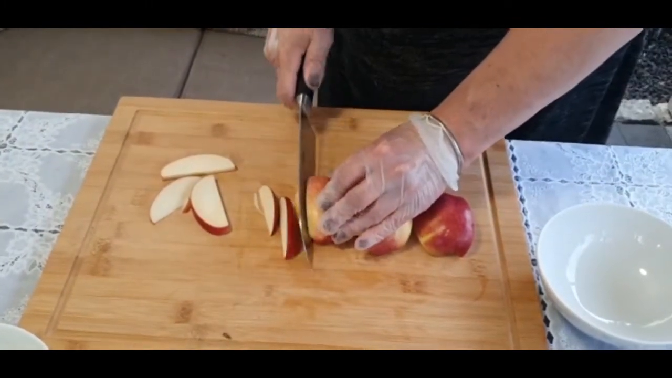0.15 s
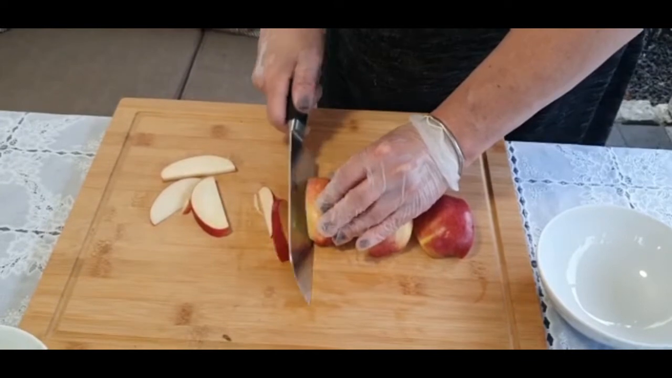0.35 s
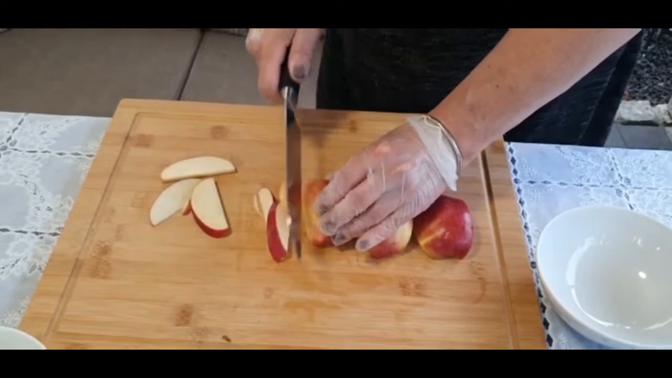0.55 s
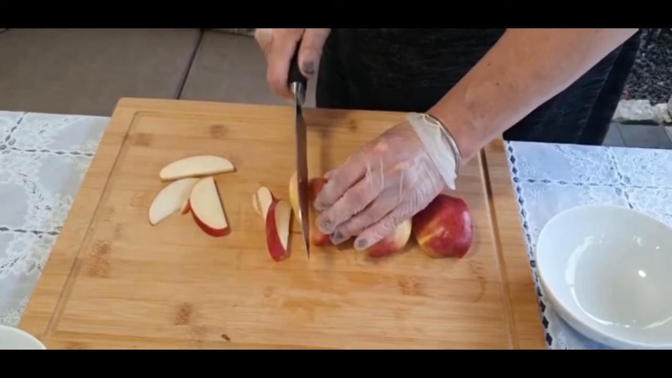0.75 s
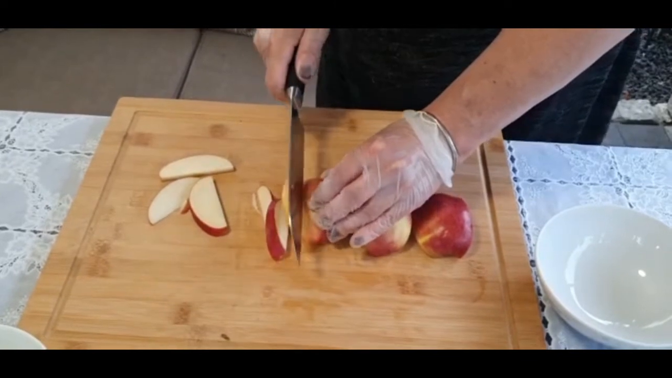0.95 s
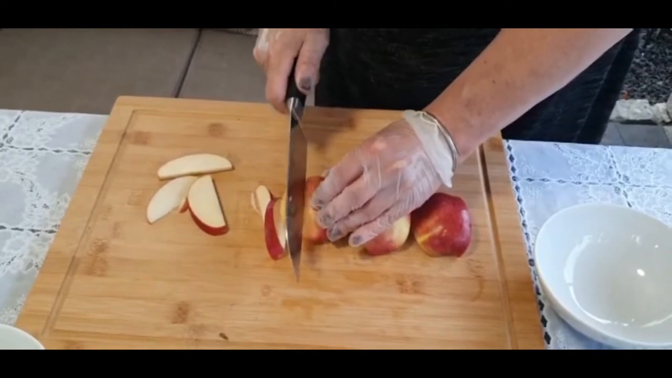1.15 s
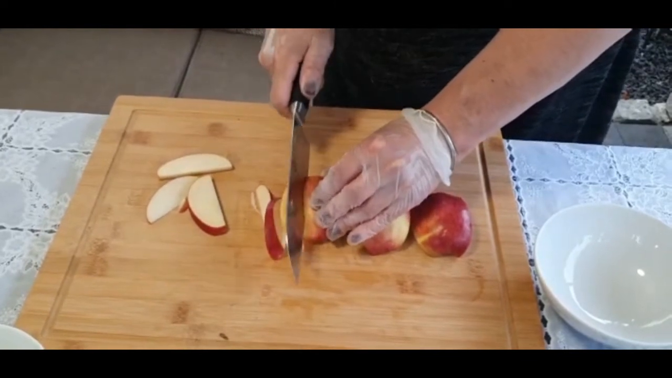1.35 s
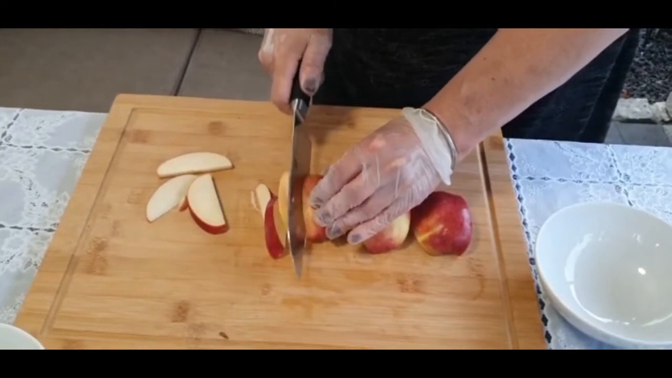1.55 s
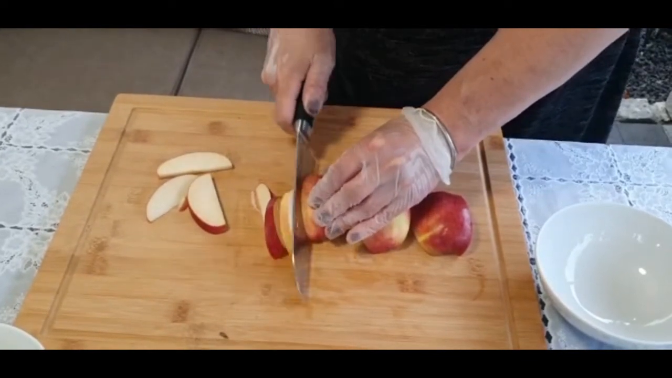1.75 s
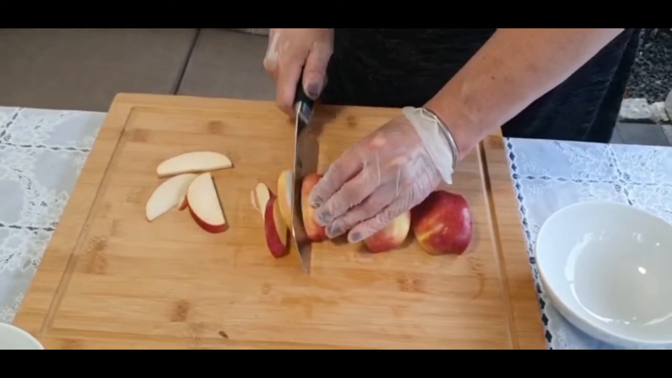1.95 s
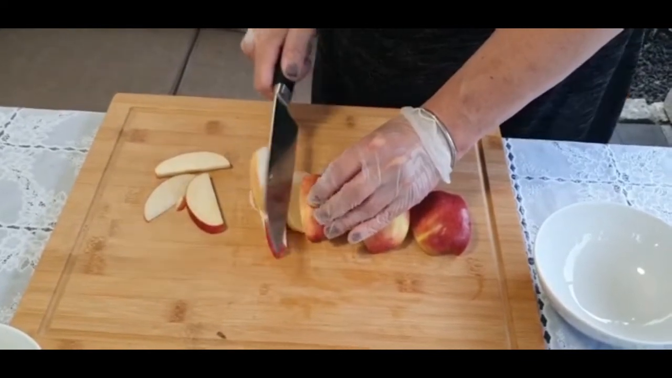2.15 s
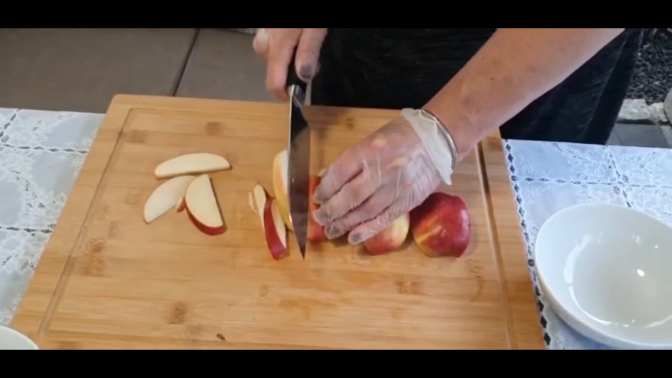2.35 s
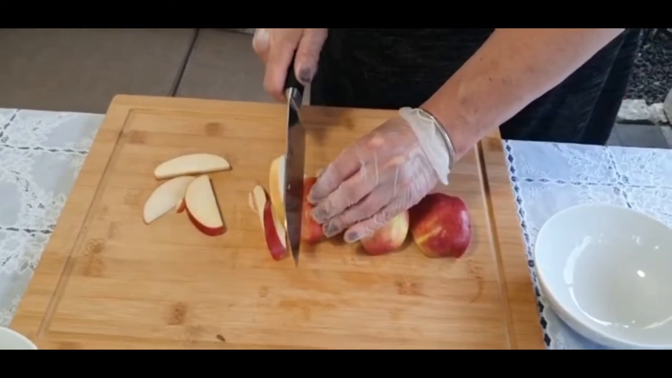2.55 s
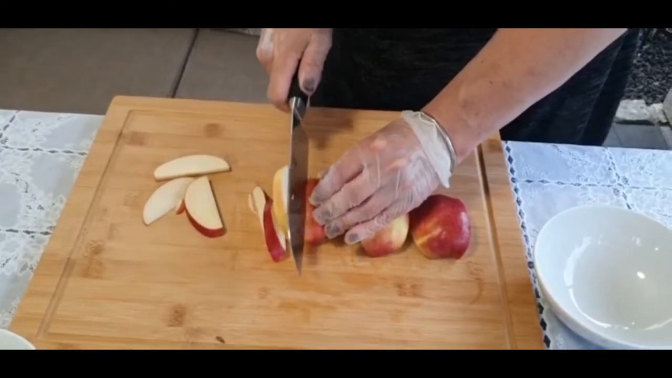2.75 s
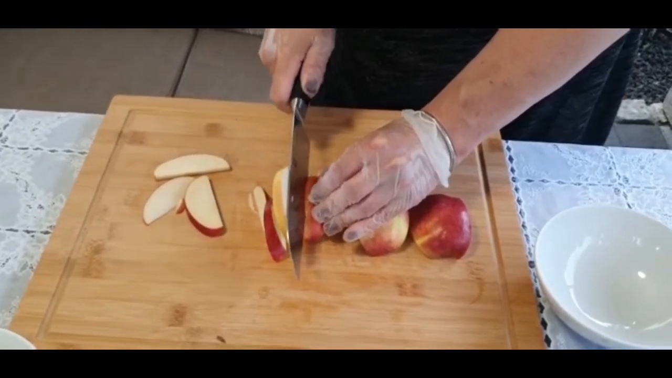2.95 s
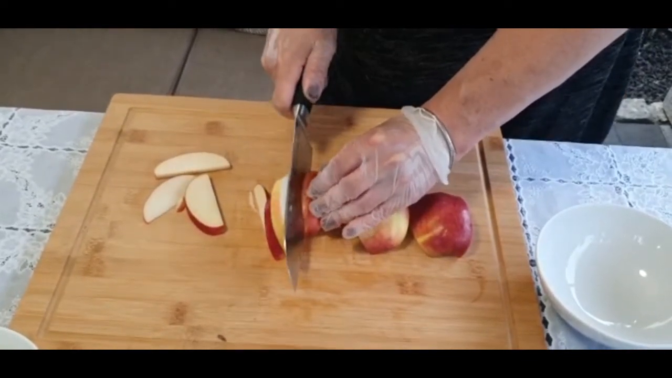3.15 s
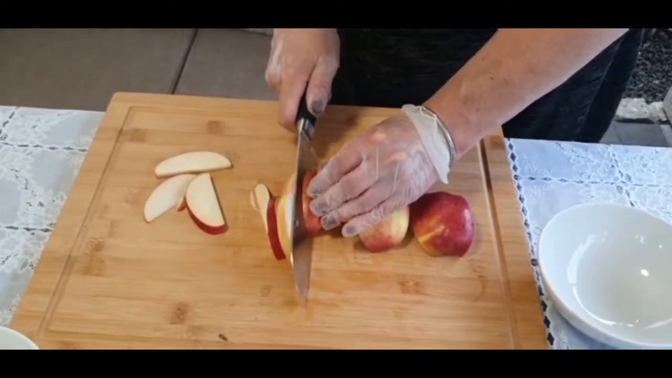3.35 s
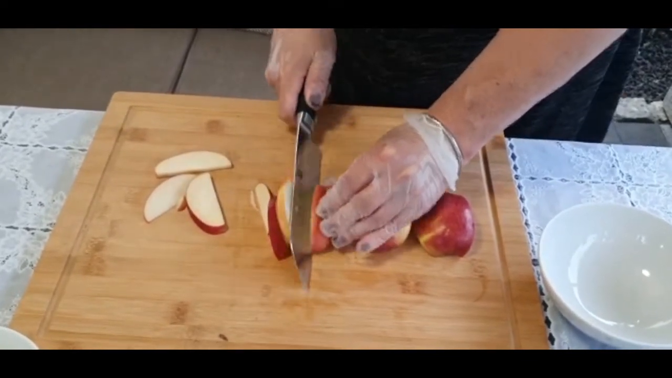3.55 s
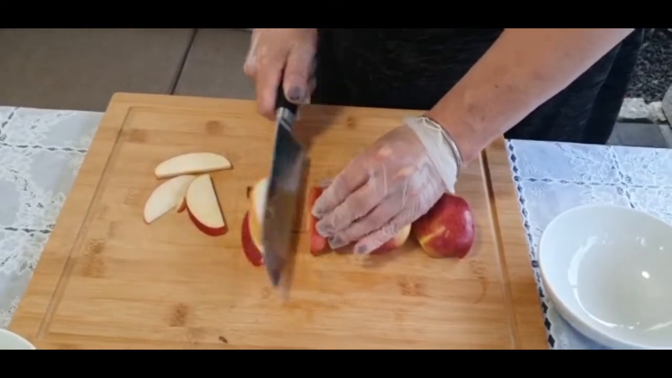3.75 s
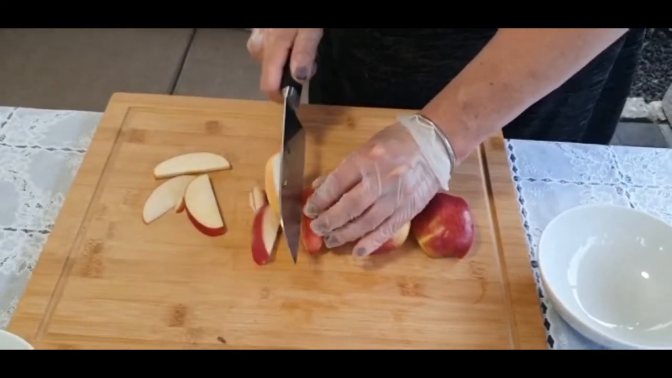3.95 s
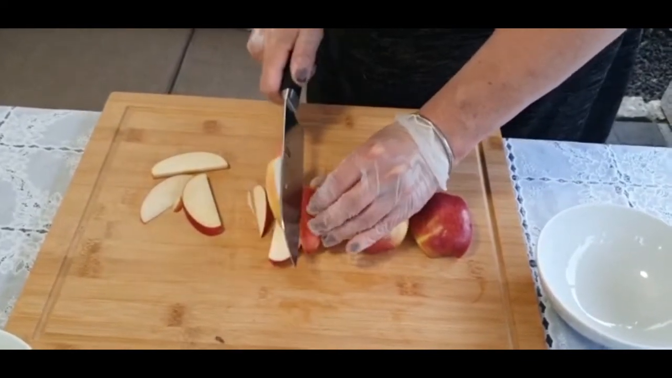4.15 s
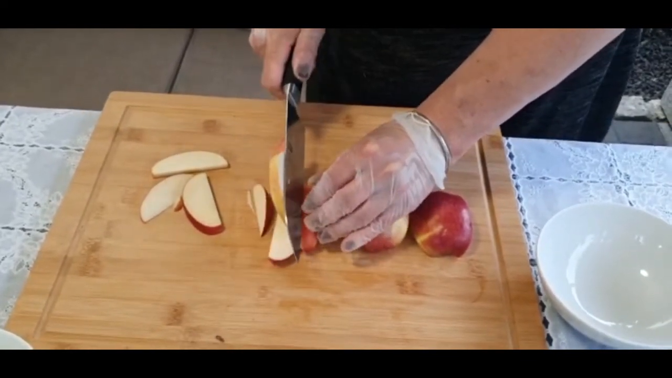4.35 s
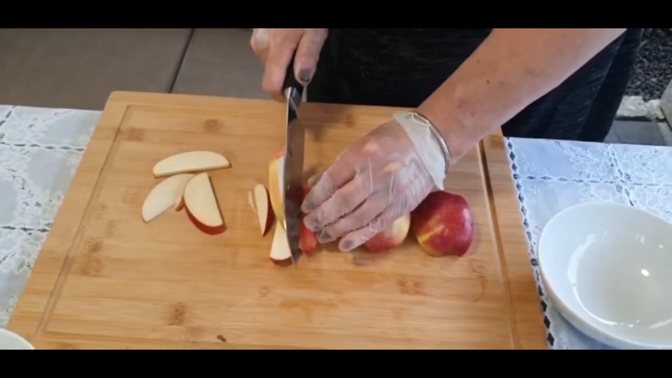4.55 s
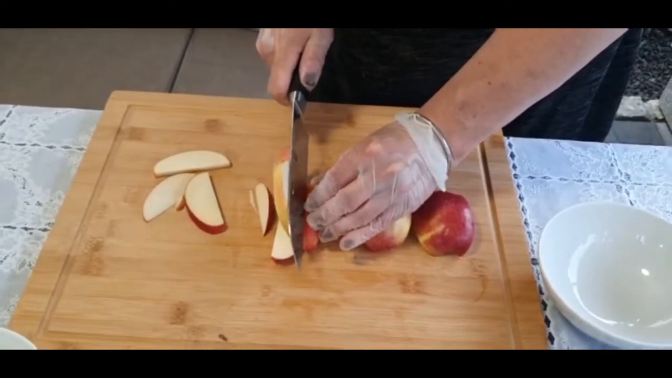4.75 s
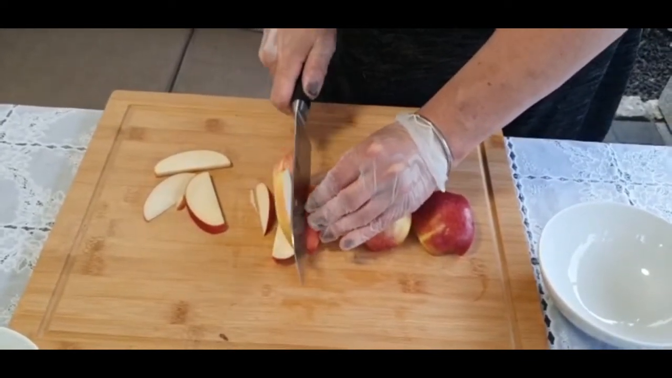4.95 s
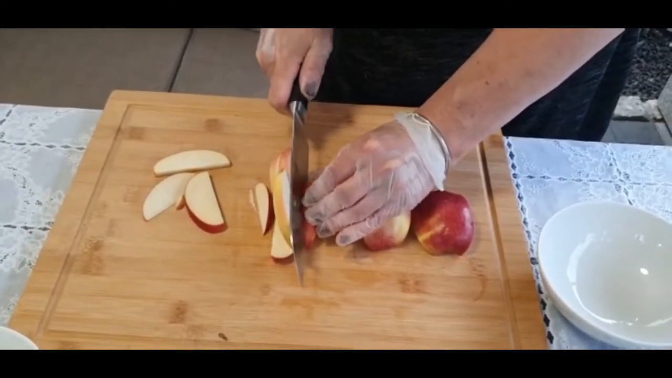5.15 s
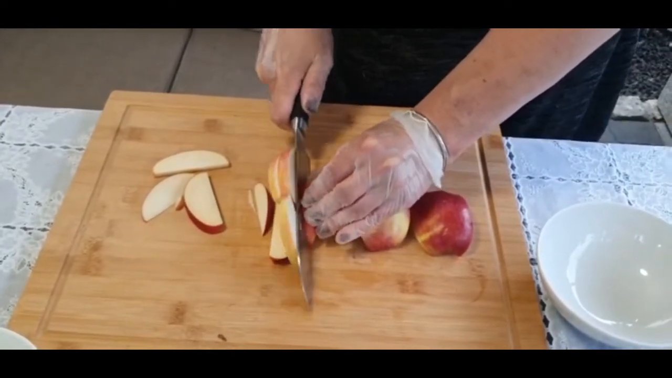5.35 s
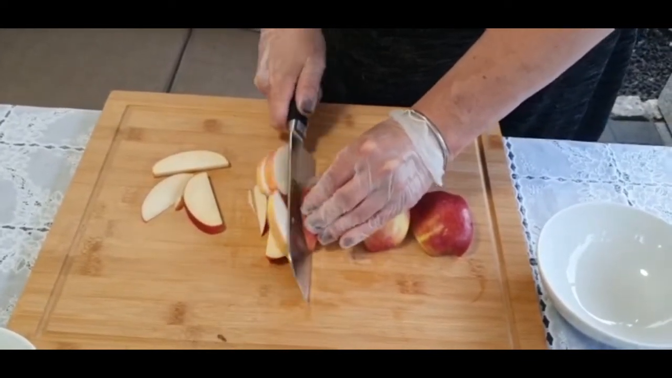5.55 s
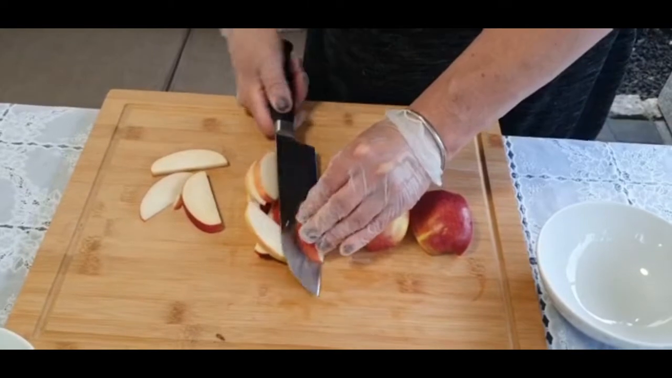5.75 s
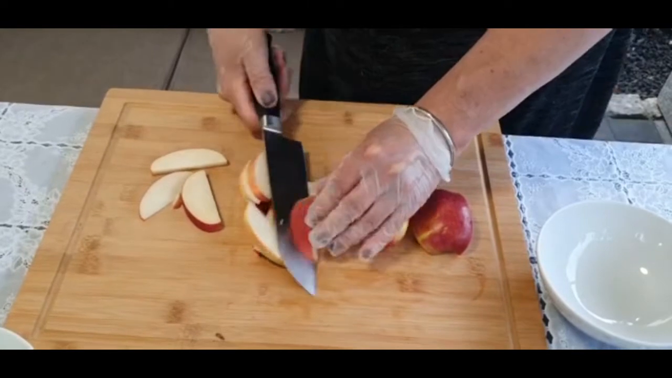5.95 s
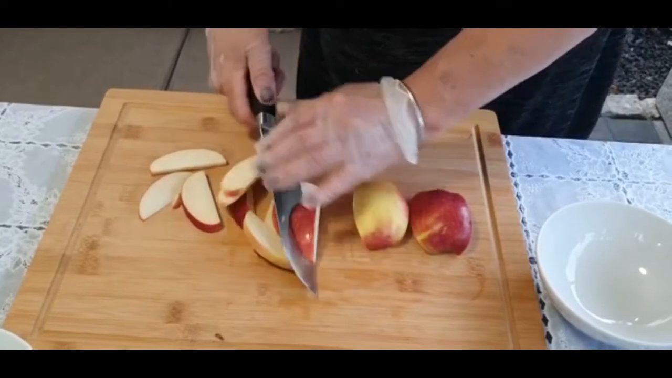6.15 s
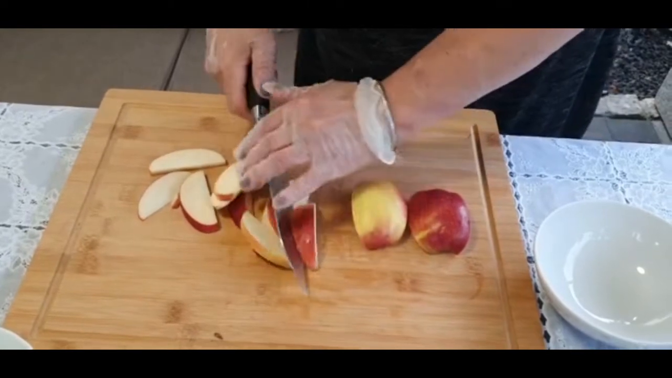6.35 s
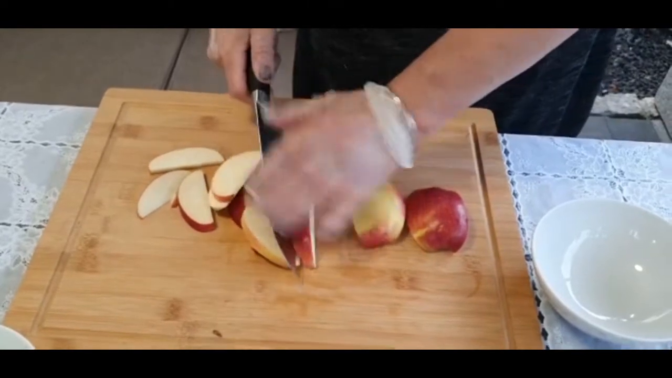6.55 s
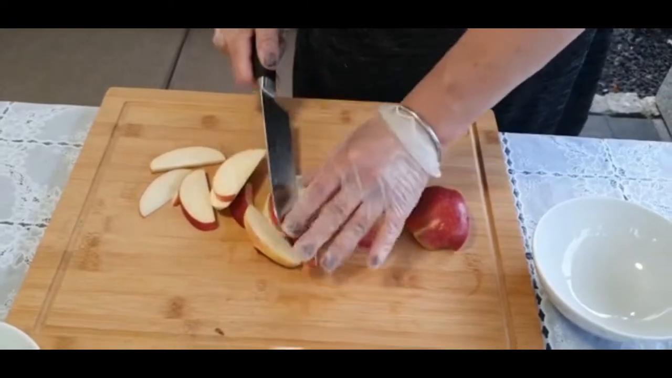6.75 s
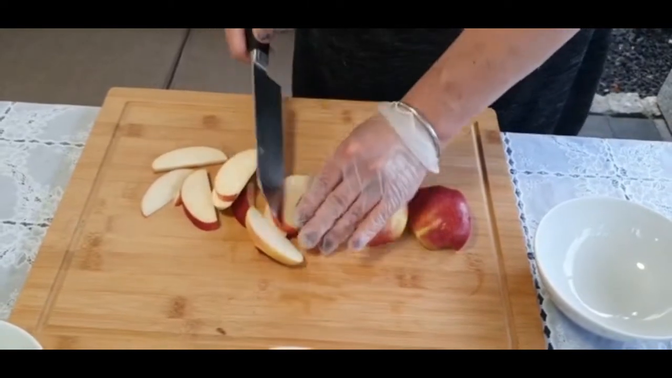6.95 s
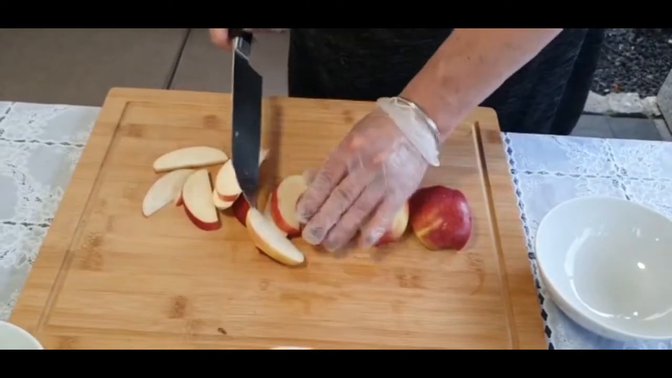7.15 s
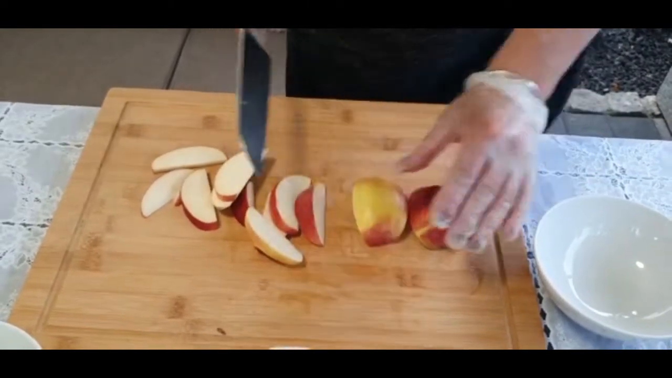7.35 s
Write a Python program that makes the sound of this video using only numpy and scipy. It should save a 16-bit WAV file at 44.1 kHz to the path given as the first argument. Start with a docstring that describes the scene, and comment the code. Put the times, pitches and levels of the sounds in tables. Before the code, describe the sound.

A kitchen knife slices juicy apple on a wooden board, with three hard knocks, crisp wet crunches, thin squeaks, then soft gloved rustling.

```python
"""A small room: a kitchen knife slices apple quarters on a wooden board in four cuts.
Cell bursts hiss under each push; force pulses ring board and table modes for knocks, thuds and chatter.
Gliding tones, probably wet steel on apple, give thin squeaks; random snaps give glove and slice rustle.
Coloured noise gives the low room rumble and soft hiss behind."""
import sys
import numpy as np
from scipy import signal
from scipy.fft import rfft, irfft, next_fast_len
from scipy.io import wavfile

SR = 44100
rng = np.random.default_rng(int(sys.argv[2]) if len(sys.argv) > 2 else 0)


def bounce(signal):
    """Save signal as a 16-bit WAV file at the path given by the first command-line argument."""
    frames = np.transpose(np.atleast_2d(signal))
    limited = np.clip(frames, -1, 1)
    pcm = np.round(limited * 32767).astype(np.int16)
    wavfile.write(sys.argv[1], SR, pcm)


N = 325899

# room background spectrum: (frequency [Hz], density [dB per Hz, relative])
AIR_SPECTRUM = [(20, -20), (80, 2.5), (122, -6), (160, -6), (221, -13), (289, -8.5), (370, -16), (780, -13),
                (1300, -20), (2100, -12.5), (6500, -21), (8300, -34), (11500, -39), (15500, -49)]
# background level: (time [s], level [dB])
AIR_LEVEL = [(0, -50), (.6, -62.5), (1.2, -57.5), (2.2, -54), (3.8, -55.5), (4.4, -56.5), (5.9, -55),
             (7.39, -57)]
# left-right likeness: (frequency [Hz], correlation [-1 to 1])
LIKENESS = [(60, 0.92), (300, 0.86), (700, 0.66), (1300, -0.051), (2500, 0.25), (5000, 0.083),
            (12000, -0.057)]
# thin squeaks: (start [s], length [s], pitch [Hz], glide [Hz/s], level [dB], roughness [0-1, clipped])
SQUEAKS = [(-.01, 0.028, 2185, 0, -44.5, 0.35), (.52, 0.18, 2465, 170, -66, .4),
           (.853, 0.04, 1646, -4200, -56.5, 0.6), (1.766, 0.23, 2180, -570, -49.5, 1.15),
           (1.95, 0.13, 1898, 1000, -50.5, 0), (2.267, 0.083, 1520, 500, -59, 0.5),
           (2.403, 0.12, 2238, 445, -43, 0.2), (2.499, .022, 2285, 1800, -40.5, .5),
           (3.19, .22, 2110, -750, -43.5, 0.67), (3.525, 0.093, 2988, -350, -47.5, 0),
           (3.644, 0.24, 1658, 887, -59, 0.65), (3.78, 0.24, 5040, -2400, -67, .75),
           (3.993, 0.079, 1927, -1000, -60, 0.54), (4.269, 0.17, 2230, 197, -69, 0.17),
           (5.05, 0.058, 834, 0, -57, .7), (5.085, .046, 1786, 2186, -47.5, 0.6),
           (5.524, 0.076, 2276, -450, -48, 1.1), (5.644, 0.036, 2212, -600, -35, 0.7),
           (6.37, .15, 4390, 750, -60, .55), (6.52, .07, 4940, 700, -64, .6)]
# blade pushes through the flesh: (middle [s], half length to 1/e [s], level before crunch gain [dB])
STROKES = [(0.108, 0.044, -47), (0.233, 0.046, -59), (0.346, 0.044, -71), (1.061, 0.055, -75),
           (1.337, 0.056, -56.5), (1.522, 0.055, -64), (1.688, 0.064, -50.5), (1.89, 0.055, -50),
           (2.162, 0.04, -72.5), (2.635, 0.07, -60.5), (2.792, 0.028, -69.5), (2.962, 0.044, -49),
           (3.136, 0.073, -60), (3.306, 0.054, -46.5), (3.432, 0.0061, -49), (3.478, 0.058, -50),
           (3.623, 0.066, -71), (4.612, 0.08, -66.5), (4.757, 0.049, -71.5), (4.919, 0.067, -53),
           (5.108, 0.075, -68.5), (5.299, 0.043, -45.5), (5.393, 0.029, -53.5), (5.503, 0.058, -54.5),
           (5.676, 0.068, -59.5)]
# crunch spectrum: (frequency [Hz], density [dB per Hz, relative])
FLESH_SPECTRUM = [(88, -19), (150, -7), (462, -9), (860, -9.5), (1020, -5), (1630, -3.5), (1870, -1),
                  (3100, -5), (3550, -4.5), (5030, -3), (6470, -3), (8010, -9.5), (11400, -9),
                  (15500, -12.5)]
# close reflections off board, bowl and body: (path difference [s], left [dB], right [dB])
NEARBY = [(.00031, -13, -16), (.00087, -17, -11), (.0021, -13, -15), (.0047, -16, -12)]
# knife knocks and taps on the board; the last is a soft touch on a slice:
# (time [s], impulse [dB], contact brightness [Hz])
KNOCKS = [(0.1196, 3, 3800), (0.233, -26.5, 1513), (1.7233, -10, 1250), (3.4341, 5, 1860),
          (4.083, -23, 2800), (5.3260, 2.5, 2600), (5.557, -27, 5000), (6.135, -32, 2140),
          (7.319, -38.5, 2200)]
# quickly damped bending modes of the board: (frequency [Hz], level [dB], t60 [s])
CLACK_MODES = [(1011, -17.5, 0.064), (1225, -12.5, 0.024), (1610, -10, 0.013), (1954, -12, 0.016),
               (2550, -12, 0.0067), (3543, -12.5, 0.031), (6220, -15.5, .01)]
# longer ring of board and blade: (frequency [Hz], level before ring gain [dB])
RING_MODES = [(646.0, -50), (947.5, -49), (1034, -39), (1276, -45), (1523, -43), (2078, -49), (2180, -48),
              (2433, -49), (2519, -47), (2697, -47), (3198, -55), (3354, -52), (3483, -49), (3838, -50)]
# low modes of the board on the table: (frequency [Hz], level before weight [dB], t60 [s])
TABLE_MODES = [(79.1, -45.5, 0.49), (160.9, -38.5, 0.28), (208, -38.5, 0.1), (274, -34.5, 0.14),
               (340, -33.5, 0.054), (419, -38, 0.2), (625, -38, 0.084), (803.5, -32.5, 0.039)]
# spectrum of the room's answer to a blow: (frequency [Hz], density [dB per Hz, relative])
ECHO_SPECTRUM = [(60, -25.5), (150, -26), (330, -15.5), (480, -9), (760, -6), (1100, -2.5), (2500, 3.5),
                 (3100, 1.5), (3700, 4.5), (4800, 0), (6200, 7.5), (8000, -12.5), (16000, -26)]
# room decay: (frequency [Hz], t60 [s])
ROOM_T60 = [(100, 0.71), (400, 0.16), (1200, 0.19), (3000, 0.17), (8000, 0.25)]
# apple pressed on the board: (time [s], impulse [dB])
THUDS = [(1.543, -24.5), (1.805, -15.5), (1.91, -18.5), (2.281, -16), (3.918, -24.5), (4.033, -23.5),
         (4.324, -27), (6.452, -18)]
# twisted blade chatters on the board: (time [s], impulse [dB], first brightness [Hz], table weight [dB])
CHATTERS = [(5.112, -26.5, 5630, 3), (5.637, -16, 1390, 15)]
# gloved hand moves slices: (time [s], crinkle before gain [dB], sliding before gain [dB])
HANDLING = [(5.8, -81, -65.5), (6.118, -87, -69), (6.246, -61, -54), (6.436, -73, -62), (6.454, -64, -54),
            (6.552, -72.5, -67), (6.69, -73, -63), (6.746, -62.5, -54.5), (6.804, -77, -56),
            (6.946, -69, -50), (6.986, -82, -64.5), (7.176, -95, -68), (7.318, -75, -56.5),
            (7.39, -82, -68)]
# glove spectrum: (frequency [Hz], density [dB per Hz, relative])
CRINKLE_SPECTRUM = [(500, -13), (2000, -4.5), (6000, -13), (8000, -8.5), (12000, -4.5), (16000, -11.5)]
# sliding spectrum: (frequency [Hz], density [dB per Hz, relative])
SLIDE_SPECTRUM = [(300, -8), (1200, -6.5), (2500, -1), (3300, -3.5), (4400, 2), (5100, -4), (6100, 2.5),
                  (7600, -15.5), (16000, -28)]

# low crunch of a firm push; grows per dB that a push is gentler
FIRM_PUSH_DB, LOW_CRUNCH_DB, LOW_DB_PER_DB = -45.5, -3, 0.46
# a knock above this ends a cut; the edge then rests on the board, adding low crunch
CHOP_ABOVE_DB, ON_BOARD_S, ON_BOARD_DB = -15, .4, 5.5
# share of a knock that reaches the table; grows per dB that a knock is lighter
WEIGHT_AT_0_DB, WEIGHT_DB_PER_DB = 2, 0.1578
RING_T60_S = .18
TICK_DB, TICK_T60_S, TICK_HZ = -36.5, .015, 3680  # contact tick, level at this brightness
THUD_HZ, THUD_WEIGHT_DB = 288, 8.5
# thuds above the threshold settle with a second, deeper bump; SETTLE_DB is relative to the thud
SETTLE_ABOVE_DB, SETTLE_S, SETTLE_DB, SETTLE_HZ = -18, 0.033, 3.5, 110
# steps from touch to touch; later touches land flat and bright
CHATTER_GAP_S, CHATTER_LOSS_DB, CHATTER_LATER_HZ = .0085, 3.5, 5130
CUTOFF_HZ = 15850


def from_db(db):
    """Decibels to gain."""
    return 10 ** (np.asarray(db) / 20)


def rms_one(x):
    """Scale to rms 1."""
    return x / np.sqrt(np.mean(x ** 2) + 1e-20)


def in_time(rows, outside=None):
    """Interpolate each column of a time table at every sample."""
    time_s, *columns = np.transpose(rows)
    now_s = np.arange(N) / SR
    return [np.interp(now_s, time_s, column, outside, outside) for column in columns]


def at_hz(points, hz):
    """Read a table on a log-frequency axis."""
    table_hz, value = np.transpose(points)
    return np.interp(np.log(np.maximum(hz, 1)), np.log(table_hz), value)


def drift(rate_hz):
    """Smooth random signal with spread 1: two-pole lowpassed noise."""
    step = 40  # samples per slow value
    pole = np.exp(-2 * np.pi * rate_hz * step / SR)
    noise = rng.standard_normal(N // step + 2002)
    slow = signal.lfilter([1], [1, -2 * pole, pole * pole], noise)[2000:]  # skip the run-in
    return np.interp(np.arange(N) / step, np.arange(len(slow)), rms_one(slow))


def colour(pair, spectrum):
    """Shape two unrelated signals into stereo with this spectrum and the LIKENESS correlation; rms 1."""
    length = pair.shape[1]
    size = next_fast_len(length)
    hz = np.arange(size // 2 + 1) * SR / size
    mid, side = rfft(pair, size) * from_db(at_hz(spectrum, hz))
    alike = np.clip(at_hz(LIKENESS, hz), -1, 1)
    stereo = np.sqrt(1 + alike) * mid + np.sqrt(1 - alike) * side * [[1], [-1]]
    return rms_one(irfft(stereo, size)[:, :length])


def grains(per_s, spread_db):
    """Two streams of tiny snaps of uneven size."""
    sizes = from_db(spread_db * np.minimum(rng.exponential(1, (2, N)), 5))
    present = rng.random((2, N)) < per_s / SR
    return rng.standard_normal((2, N)) * sizes * present


def pan(left_db):
    """Channel gains; left_db is left relative to right."""
    return from_db(np.array([[left_db], [-left_db]]) / 2)


def background():
    """Low rumble and soft hiss of the room: coloured noise of slowly varying level."""
    level_db, = in_time(AIR_LEVEL)
    noise = colour(rng.standard_normal((2, N)), AIR_SPECTRUM)
    return from_db(level_db) * noise * pan(left_db=-0.85)


def squeaks(waver, echo_db, echo_t60_s):
    """Stick-slip, probably of wet steel on apple: a gliding tone that breaks into a narrow rasp when rough."""
    now_s, tone = np.arange(N) / SR, np.zeros(N)
    wobble = 1 + waver * drift(50)
    rasp = (drift(230) + 1j * drift(230)) / np.sqrt(2)
    for start_s, length_s, start_hz, glide_hz_per_s, db, rough in SQUEAKS:
        on = (now_s > start_s) & (now_s < start_s + length_s)
        age_s = now_s[on] - start_s
        rough = np.clip(rough, 0, 1)
        hz = (start_hz + glide_hz_per_s * age_s) * wobble[on]
        grip = np.sqrt(1 - rough ** 2) + rough * rasp[on]
        carrier = np.exp(2j * np.pi * np.cumsum(hz) / SR)
        tone[on] += from_db(db) * np.sin(np.pi * age_s / length_s) * np.real(grip * carrier)
    tone *= from_db(2 * drift(30))  # the grip flutters
    t = now_s[:SR // 2]
    tail = rng.standard_normal((2, len(t))) * from_db(-60 * t / echo_t60_s)
    echo = rms_one(tail) / np.sqrt(len(t))
    return tone + from_db(echo_db) * signal.fftconvolve(tone[None], echo, axes=1)[:, :N]


def swell(middle_s, half_s):
    """Hand speed of one push: a Gaussian rise and fall."""
    return np.exp(-((np.arange(N) / SR - middle_s) / half_s) ** 2)


def low_crunch(s, db):
    """Low-band gain in dB: higher for gentle pushes and while the edge rests on the board."""
    chops_s = [hit_s for hit_s, hit_db, _ in KNOCKS if hit_db > CHOP_ABOVE_DB]
    on_board = any(0 < s - hit_s < ON_BOARD_S for hit_s in chops_s)
    return LOW_CRUNCH_DB + LOW_DB_PER_DB * (FIRM_PUSH_DB - db) + ON_BOARD_DB * on_board


def slicing(crunch_db, low_hz):
    """Under each push thousands of cells burst ahead of the blade and merge into a juicy hiss."""
    push, deep = 0, 0
    for middle_s, half_s, db in STROKES:
        speed = from_db(db) * swell(middle_s, half_s)
        push = push + speed
        deep = deep + speed * (from_db(low_crunch(middle_s, db)) - 1)  # excess over the plain push
    bursts = grains(per_s=14000, spread_db=0.5) * from_db(1.0 * drift(60))
    cells = colour(bursts, FLESH_SPECTRUM)
    low = signal.sosfilt(signal.butter(1, low_hz, fs=SR, output="sos"), cells)
    return from_db(crunch_db) * (push * cells + deep * low) * pan(left_db=-0.8)


def nearby(x):
    """Close surfaces comb the sound a little differently on each side."""
    out = x.copy()
    for s, left_db, right_db in NEARBY:
        lag = max(int(s * SR), 1)
        out[:, lag:] += from_db([[left_db], [right_db]]) * x[:, :-lag]
    return out


def struck(modes, t, lag_s):
    """Decaying modes of alternating sign; force shares and per-side lags are drawn anew for each blow."""
    out = np.zeros((2, len(t)))
    for k, (hz, db, t60_s) in enumerate(modes):
        share_db = rng.normal(0, 1, (2, 1))
        # a lag shifts the phase of high modes most, so they are less alike on the two sides
        late = np.maximum(t - np.abs(rng.normal(0, 1, (2, 1))) * lag_s, 0)
        motion = from_db(db + share_db - 60 * late / t60_s) * np.sin(2 * np.pi * hz * late)
        # the air follows the speed of the wood, so no bass is radiated below a mode
        speed = np.diff(motion, prepend=0) * SR / (2 * np.pi * hz)
        out += (-1) ** k * speed
    return out


def room_answer(t, build_s):
    """Dense reflections that build up in a few milliseconds and die band by band."""
    noise = rfft(colour(rng.standard_normal((2, len(t))), ECHO_SPECTRUM))
    hz = np.arange(noise.shape[1]) * SR / len(t)
    centres_hz, t60s = np.transpose(ROOM_T60)
    out = 0
    for share, t60_s in zip(np.eye(len(centres_hz)), t60s):
        band = irfft(noise * at_hz(np.c_[centres_hz, share], hz), len(t))
        out = out + band * from_db(-60 * t / t60_s)
    return out * (1 - np.exp(-t / build_s))


def blow(db, bright_hz, weight_db, ring_db, room_db):
    """A force pulse, duller when apple cushions it, into board, table and room; hard contacts tick more."""
    t = np.arange(SR) / SR
    ring = [(hz, mode_db + ring_db, RING_T60_S) for hz, mode_db in RING_MODES]
    board = struck(CLACK_MODES, t, lag_s=.0001) + struck(ring, t, lag_s=.0001)
    table = from_db(weight_db) * struck(TABLE_MODES, t, lag_s=.0001)
    room = from_db(room_db) * room_answer(t, build_s=.004)
    contact = signal.butter(4, min(bright_hz, SR / 3), fs=SR, output="sos")
    tick_gain = from_db(TICK_DB - 60 * t / TICK_T60_S) * (bright_hz / TICK_HZ) ** 2
    tick = tick_gain * rng.standard_normal((2, len(t)))
    return from_db(db) * (signal.sosfilt(contact, board + table + room) + tick)


def chatter(count):
    """Blade twisted free: quick runs of ever weaker touches, as rows for contacts()."""
    touches = []
    for s, db, first_hz, weight_db in CHATTERS:
        for k in range(count):
            bright_hz = CHATTER_LATER_HZ if k else first_hz
            touches.append((s + k * CHATTER_GAP_S, db - k * CHATTER_LOSS_DB, bright_hz, weight_db))
    return touches


def contacts():
    """All knocks, touches and thuds: (time [s], impulse [dB], brightness [Hz], table weight [dB])."""
    knife = [(s, db, hz, WEIGHT_AT_0_DB - WEIGHT_DB_PER_DB * db) for s, db, hz in KNOCKS]
    apple = [(s, db, THUD_HZ, THUD_WEIGHT_DB) for s, db in THUDS]
    settling = [(s + SETTLE_S, db + SETTLE_DB, SETTLE_HZ, THUD_WEIGHT_DB)
                for s, db in THUDS if db > SETTLE_ABOVE_DB]
    return knife + apple + settling + chatter(count=4)


def knocks(ring_db, room_db):
    """Chops, taps, touches, thuds and chatter all excite the same modes."""
    out = np.zeros((2, N + 2 * SR))
    for s, db, bright_hz, weight_db in contacts():
        start = int(s * SR)
        out[:, start:start + SR] += blow(db, bright_hz, weight_db, ring_db, room_db)
    return out[:, :N] * pan(left_db=-1.2)


def handling(crinkle_db, slide_db):
    """The thin glove crinkles in snaps while wet slices slide unevenly on wood and steel."""
    crinkle_level_db, slide_level_db = in_time(HANDLING, outside=-120)
    glove = colour(grains(per_s=1300, spread_db=1.0), CRINKLE_SPECTRUM)
    slices = colour(grains(per_s=3500, spread_db=0.5), SLIDE_SPECTRUM)
    catching = from_db(1.1 * drift(53.0))
    crinkling = from_db(crinkle_db + crinkle_level_db) * glove
    sliding = from_db(slide_db + slide_level_db) * slices
    return catching * (crinkling + sliding)


def scene():
    """Knife, board, hand and room together."""
    squeaking = squeaks(waver=0.0093, echo_db=3.0, echo_t60_s=0.18)
    rustle = nearby(slicing(crunch_db=9.5, low_hz=2040) + handling(crinkle_db=6.5, slide_db=0.5))
    blows = knocks(ring_db=6, room_db=-12)
    return background() + squeaking + rustle + blows


def record(dry):
    """Round the loudest peaks, then cut the top with a steep lowpass."""
    rounded = dry / (1 + dry ** 6) ** (1 / 6)
    return signal.sosfilt(signal.ellip(10, .1, 70, CUTOFF_HZ, fs=SR, output="sos"), rounded)


dry = scene()
out = record(dry)
bounce(out)
```